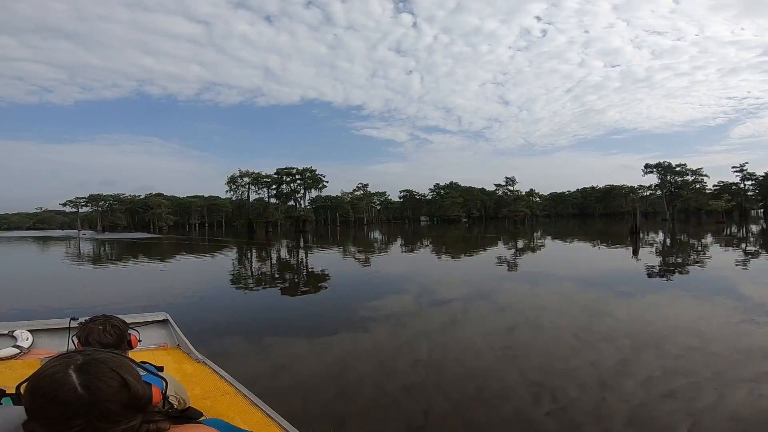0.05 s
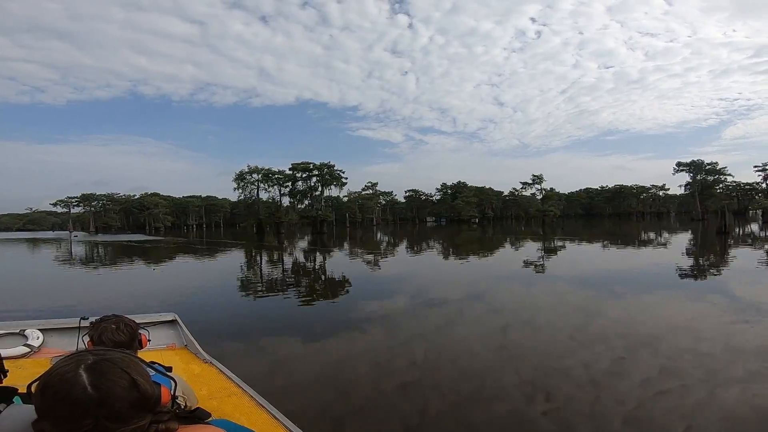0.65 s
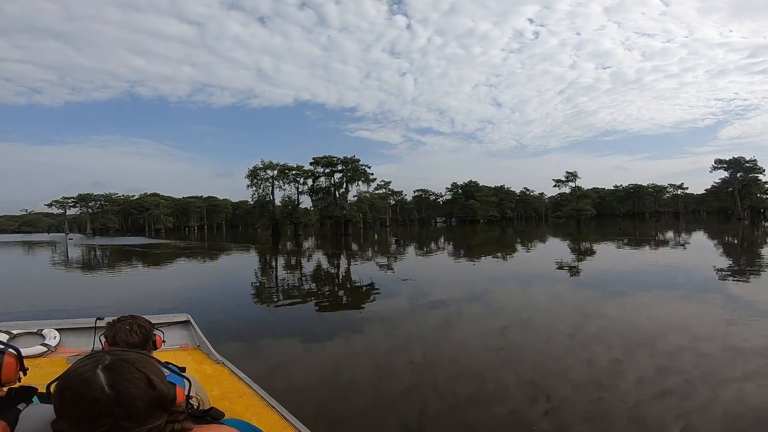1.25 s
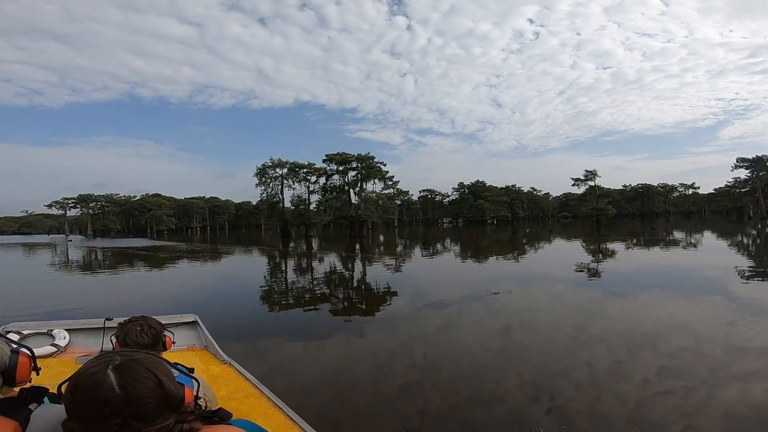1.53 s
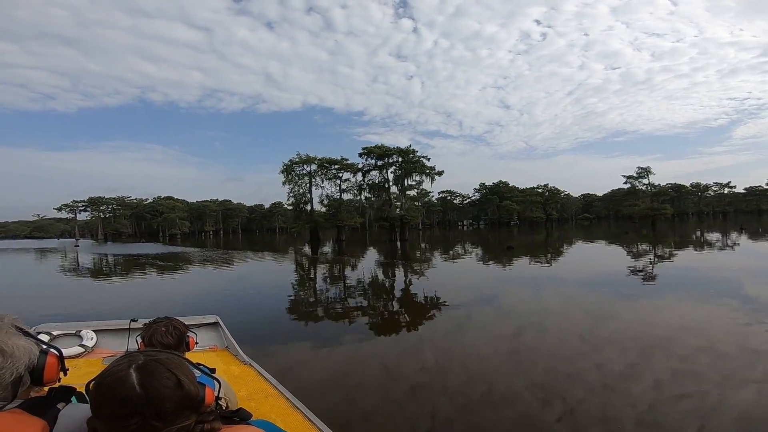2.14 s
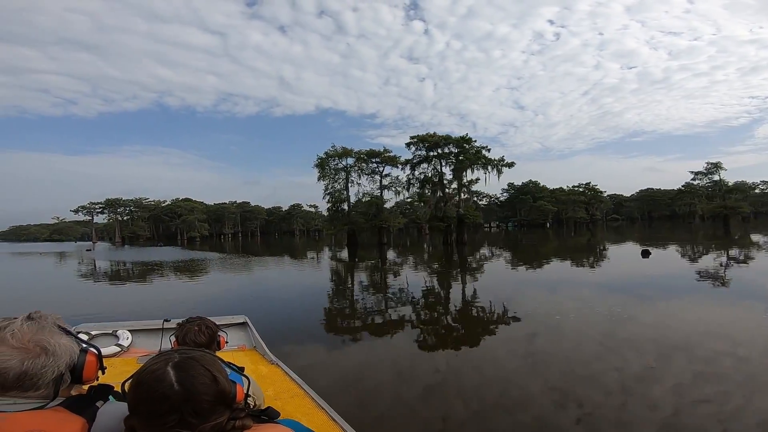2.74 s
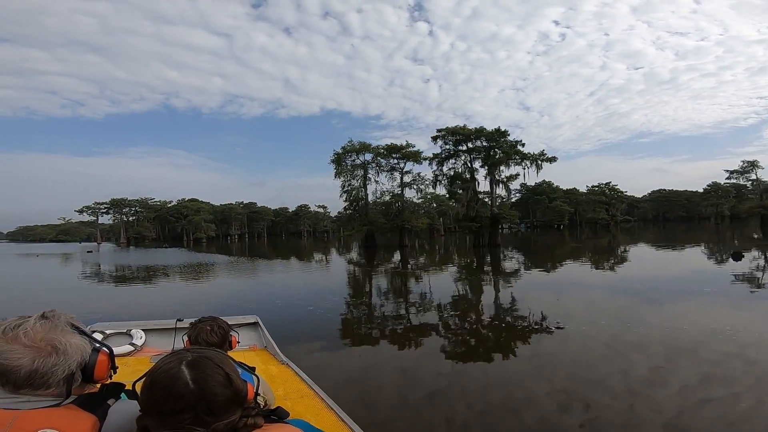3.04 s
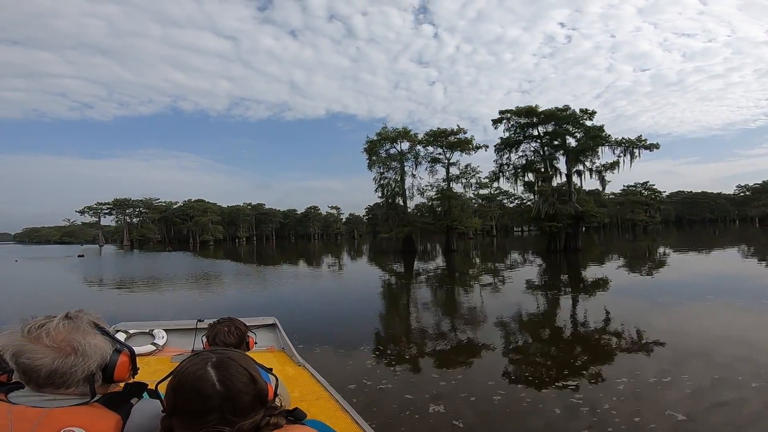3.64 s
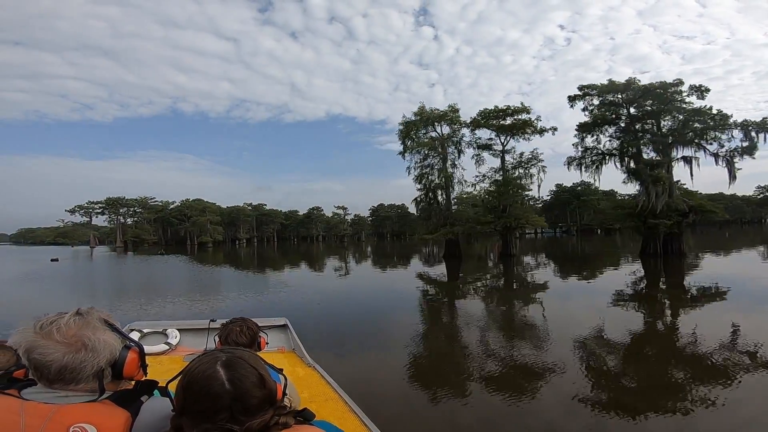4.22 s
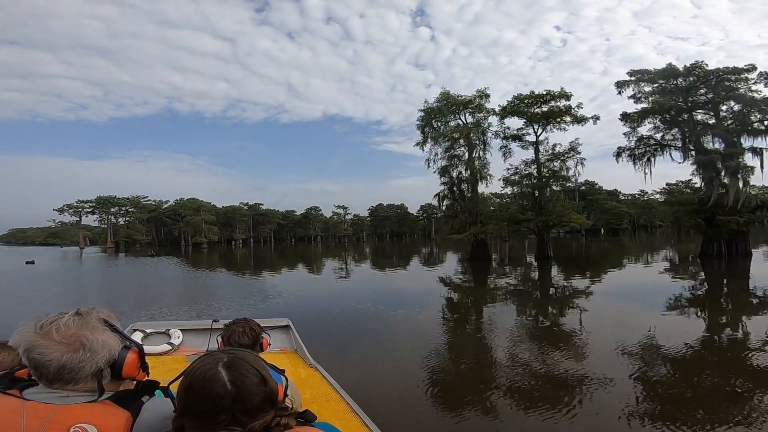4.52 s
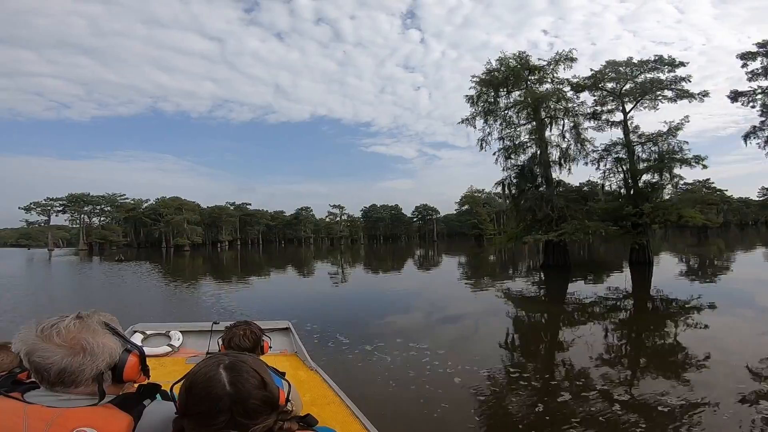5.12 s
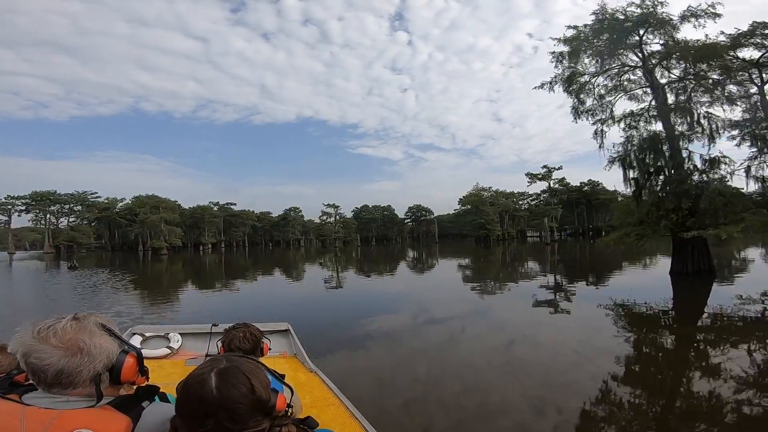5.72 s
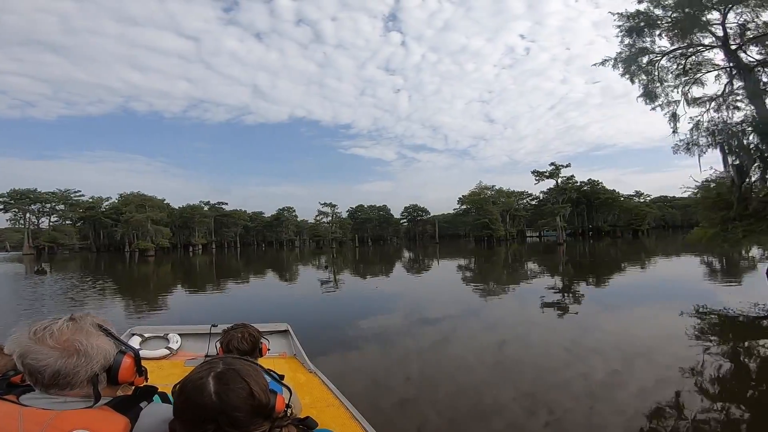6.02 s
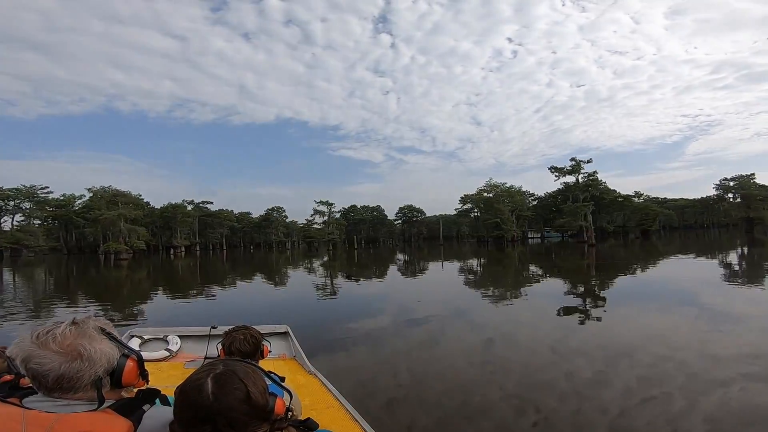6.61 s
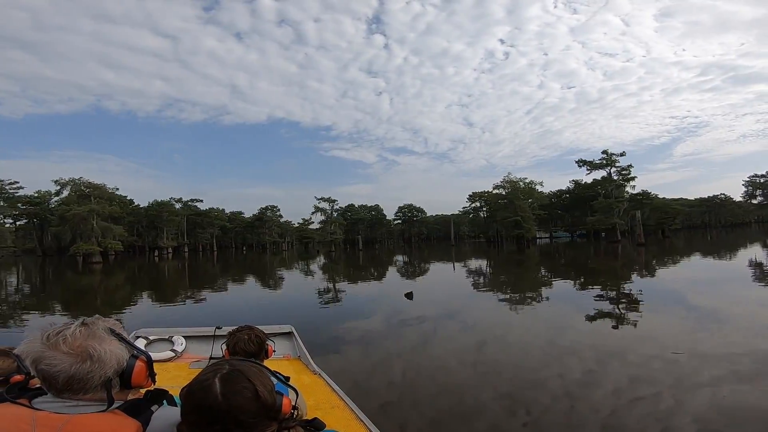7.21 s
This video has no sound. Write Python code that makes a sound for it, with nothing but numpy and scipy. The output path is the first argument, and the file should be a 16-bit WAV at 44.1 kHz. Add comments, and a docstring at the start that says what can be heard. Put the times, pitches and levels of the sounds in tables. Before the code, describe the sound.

The loud, buzzing drone of a cruising airboat holds steady on board, over wind rumble and faint spray hiss.

```python
"""On still swamp water, a cruising airboat is heard from a seat on board.
A V8 drives a three-blade propeller through a reduction belt. Each radiates a harmonic series,
and neighbouring tones of the two series beat. Turbulent wash pulses with the blades, air and
spray hiss past, wind and hull rumble, and a compressor steadies the level of the roar."""
import sys
import numpy as np
from scipy import signal
from scipy.fft import rfft, irfft, next_fast_len
from scipy.io import wavfile
from scipy.ndimage import uniform_filter1d, minimum_filter1d

SR = 44100
rng = np.random.default_rng(int(sys.argv[2]) if len(sys.argv) > 2 else 0)


def generate_wav(signal):
    """Clip the signal to [-1, 1] and save it as 16-bit WAV at the path in sys.argv[1]."""
    frames = np.transpose(np.atleast_2d(signal))
    scaled = np.clip(frames, -1, 1) * 32767
    pcm = np.round(scaled).astype(np.int16)
    wavfile.write(sys.argv[1], SR, pcm)


N = 320166

CYCLES_PER_TURN, BLADE_COUNT = 24 / 23, 3   # engine cycles (two crank turns each) per propeller turn
CHURN_HZ, CHURN_OCTAVES = 494, 0.57   # centre and width of the band where churn lifts the blade tones
USUAL_CHURN_DB = -34.5   # churn that neither lifts nor lowers any source
WASH_PER_CHURN, HISS_PER_CHURN = 1.35, -.22   # dB per dB: the wash swells as the hiss recedes

# Propeller speed, easing slightly twice: t/s, rotation rate/(turns/s)
SHAFT_SPEED = [(0.2, 26.511), (1.3, 26.513), (3.8, 26.384), (5.6, 26.484), (6.9, 26.403)]
# Churn of the air entering the propeller, as the strength of its low-middle roar: t/s, level/dB
INFLOW_CHURN = [(0.2, -35), (0.79, -32), (1.7, -31), (3.37, -38.5), (6.6, -35), (7.1, -32.5)]
# Blade tones: multiple of the blade passing frequency, relative level/dB
BLADE_HARMONICS = [(1, -26.5), (2, -25), (3, -26.5), (4, -35), (5, -50.5), (6, -42), (7, -46), (8, -45),
                   (9, -46), (10, -44), (11, -51), (12, -54.5), (13, -45), (14, -55), (15, -56.5),
                   (16, -62), (17, -61.5), (18, -53), (21, -59), (22, -58), (25, -60.5), (28, -68)]
# Tones of slightly unequal blades: multiple of the shaft frequency, relative level/dB
SHAFT_HARMONICS = [(2, -55.7), (5, -52.9), (7, -43.8), (8, -47.0), (10, -49.0), (11, -53.3), (50, -56.6)]
# Envelope of the line spectrum of the blade tips: f/Hz, relative line level/dB
RASP_ENVELOPE = [(700, -57.5), (1200, -59.5), (1450, -61.5), (1900, -67), (2600, -72)]
# Exhaust tones: multiple of the engine cycle frequency, relative level/dB
EXHAUST_HARMONICS = [(2, -44.4), (3, -38.3), (4, -50.7), (5, -25.2), (6, -41.4), (8, -39.6), (10, -37.3),
                     (11, -38.7), (12, -45.0), (13, -46.3), (14, -55.5), (15, -51.1), (16, -49.7),
                     (18, -57.4), (21, -53.1), (24, -58.7), (27, -59.2), (28, -55.6), (29, -56.3),
                     (31, -58.7), (32, -56.8), (38, -58.4)]
# Propeller wash: f/Hz, relative spectral density level/dB
WASH_SPECTRUM = [(100, -77), (330, -60.5), (480, -65.5), (600, -67.5), (780, -63.5), (920, -68),
                 (1100, -67.5), (1400, -71.5), (1800, -75), (2200, -81), (2800, -89), (4500, -103),
                 (9000, -130)]
# Wind and hull rumble: f/Hz, relative spectral density level/dB
RUMBLE_SPECTRUM = [(12, -78), (30, -66.5), (100, -61.5), (190, -54.5), (255, -53), (330, -65.5),
                   (480, -78.5), (1500, -135)]
# Air and spray hiss: f/Hz, relative spectral density level/dB
HISS_SPECTRUM = [(1500, -100), (3000, -88.5), (3550, -88), (4150, -81), (4600, -81.5), (5600, -79),
                 (6150, -84), (6900, -93), (7600, -95), (9300, -106), (11200, -116), (12100, -97),
                 (13000, -97), (15700, -108)]


def propeller(turns, churn_db, flutter, flutter_hz, scatter_cycles):
    """Periodic pressure pulses, one per blade, form harmonics; gusty inflow shakes the high ones most."""
    passes = BLADE_COUNT * turns
    blade_hz = passes[-1] * SR / N
    out = np.zeros(N)
    for k, db in BLADE_HARMONICS:
        hz = k * blade_hz
        churn_weight = np.exp(-.5 * (np.log2(hz / CHURN_HZ) / CHURN_OCTAVES) ** 2)
        treble = hz ** 2 / (hz ** 2 + 450 ** 2)
        cycles = k * passes - .2 * (k % 2)   # odd tones lag, splitting each pulse in two
        cycles += scatter_cycles * treble * rng.standard_normal()   # reflections smear the high tones
        wave = wavering(flutter * np.sqrt(treble), flutter_hz) * np.exp(2j * np.pi * cycles)
        out += np.sqrt(2) * from_db(db + churn_weight * churn_db) * wave.real
    return out + sum(tone(k * turns + rng.random(), db) for k, db in SHAFT_HARMONICS)


def tip_rasp(turns, change_hz, size=4096):
    """Each tip tears the air its own way; repetition every turn gives a slowly changing line spectrum."""
    hz, db = np.transpose(RASP_ENVELOPE)
    lines_hz = np.maximum(np.arange(size // 2 + 1) * turns[-1] * SR / N, 1)
    gain = from_db(np.interp(np.log(lines_hz), np.log(hz), db, left=-np.inf, right=-np.inf))
    out = np.zeros(N)
    for weight in (np.ones(N), drift(change_hz), drift(change_hz)):
        phasors = np.exp(2j * np.pi * rng.random(len(gain)))
        one_turn = irfft(gain * phasors, size) * size / np.sqrt(2)
        out += weight * np.interp(turns, np.arange(size) / size, one_turn, period=1)
    return out / np.sqrt(3)


def exhaust(cycles, jitter_s, uneven_db):
    """Uneven firing in each V8 bank sounds many harmonics of the cycle rate; no two cycles are alike."""
    cycle_hz = cycles[-1] * SR / N
    cycles = cycles + cycle_hz * jitter_s * drift(10)
    strength_db = uneven_db * drift(3.3)
    return sum(tone(k * cycles + rng.random(), db + strength_db) for k, db in EXHAUST_HARMONICS)


def wash(turns, gust_db):
    """Turbulence shed by the blades radiates broadband noise that pulses as they pass."""
    return noise(WASH_SPECTRUM) * swish(turns, depth=0.14, second=0.14) * from_db(gust_db * drift(22))


def churned_air(air, gain_db, band_hz):
    """Churned inflow modulates the low-middle band of the noise."""
    band = signal.butter(2, band_hz, "band", fs=SR, output="sos")
    return air + signal.sosfiltfilt(band, air) * (from_db(gain_db) - 1)


def rumble():
    """Wind and hull give stationary noise with its power at low frequencies."""
    return noise(RUMBLE_SPECTRUM)


def hiss(turns, gain_db, flicker_db):
    """Rushing air and fine spray give high-frequency noise, weakly modulated by the blades."""
    chopped = noise(HISS_SPECTRUM) * swish(turns, depth=0.05, second=0.052)
    return chopped * from_db(gain_db + flicker_db * drift(40))


def swish(turns, depth, second):
    """Amplitude modulation at the blade passing frequency and its second harmonic; mean power 1."""
    phase = 2 * np.pi * BLADE_COUNT * turns
    gain = 1 + depth * np.cos(phase) + second * np.cos(2 * phase)
    return gain / np.sqrt(np.mean(gain ** 2))


def wavering(shake, rate_hz):
    """A steady phasor plus a random one wanders in amplitude and phase; mean power 1."""
    shake = np.clip(shake, 0, .95)
    return np.sqrt(1 - shake ** 2) + shake * (drift(rate_hz) + 1j * drift(rate_hz)) / np.sqrt(2)


def drift(rate_hz, hop=100):
    """Low-pass filtering of white noise gives a slow fluctuation, scaled to unit variance."""
    pole = np.exp(-2 * np.pi * rate_hz * hop / SR)
    white = rng.standard_normal(N // hop + 1002)
    slow = signal.lfilter([1], [1, -2 * pole, pole * pole], white)[1000:]   # once the filter has settled
    return np.interp(np.arange(N) / hop, np.arange(len(slow)), (slow - slow.mean()) / slow.std())


def noise(spectrum):
    """Spectral shaping gives white noise the listed power density."""
    hz, db = np.transpose(spectrum)
    size = next_fast_len(N)
    bins_hz = np.maximum(np.fft.rfftfreq(size, 1 / SR), 1)
    gain = from_db(np.interp(np.log(bins_hz), np.log(hz), db)) * np.sqrt(SR / 2)
    return irfft(rfft(rng.standard_normal(size)) * gain, size)[:N]


def tone(cycles, db):
    """Simple harmonic motion of given rms level, its phase counted in cycles."""
    return np.sqrt(2) * from_db(db) * np.sin(2 * np.pi * cycles)


def in_time(curve):
    """Linear interpolation gives a curve's value at every sample."""
    times, values = np.transpose(curve)
    return np.interp(np.arange(N) / SR, times, values)


def from_db(db):
    """Amplitude grows tenfold for every 20 dB."""
    return 10 ** (np.asarray(db) / 20)


def compress(x, share, target_db, window_s):
    """Compression pulls the running level partway to a target, so the beats pump everything slightly."""
    power = uniform_filter1d(x ** 2, int(window_s * SR))
    power = uniform_filter1d(power, size=400)
    return x * from_db(share * (target_db - 10 * np.log10(power + 1e-9)))


def limit(x, knee, size=160):
    """Look-ahead limiting eases the gain down around peaks above the knee."""
    gain = np.sqrt(np.minimum(1, knee / (np.abs(x) + 1e-9)))
    held = minimum_filter1d(gain, 2 * size)
    return x * uniform_filter1d(uniform_filter1d(held, size), size)


def scene():
    """Superposition: propeller and engine follow one shaft speed, amid noise coloured by the churn."""
    speed = in_time(SHAFT_SPEED)
    turns = np.cumsum(speed) / SR + speed * .00004 * drift(7)   # the shaft never turns quite evenly
    churn_db = in_time(INFLOW_CHURN) - USUAL_CHURN_DB
    blades = from_db(1.1) * propeller(turns, churn_db, flutter=0.49, flutter_hz=4.1, scatter_cycles=0.34)
    engine = from_db(1.56) * exhaust(CYCLES_PER_TURN * turns, jitter_s=.00004, uneven_db=1.57)
    air = wash(turns, gust_db=0.58) + rumble()
    roar = churned_air(air, WASH_PER_CHURN * churn_db, band_hz=(290, 800))
    spray = hiss(turns, gain_db=.5 + HISS_PER_CHURN * churn_db, flicker_db=0.16)
    return (blades + engine + roar + tip_rasp(turns, change_hz=1.6) + spray)[None]


def record(dry, start_s=.0802, cutoff_hz=15750):
    """Gain control narrows the dynamic range; the sound starts abruptly and a low-pass cuts the top."""
    compressed = compress(dry, share=0.28, target_db=-19, window_s=0.05)
    gated = limit(compressed, knee=0.22) * (np.arange(N) / SR >= start_s)
    return signal.sosfilt(signal.ellip(12, .1, 80, cutoff_hz, fs=SR, output="sos"), gated)


dry = scene()
out = record(dry)
generate_wav(out)
```